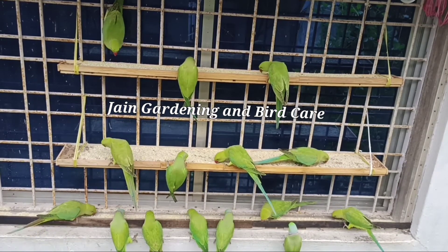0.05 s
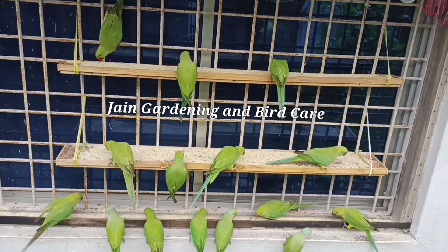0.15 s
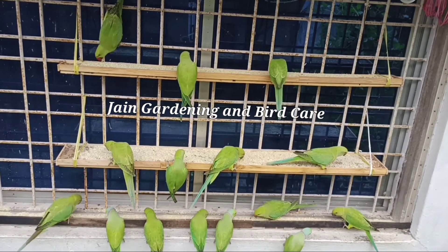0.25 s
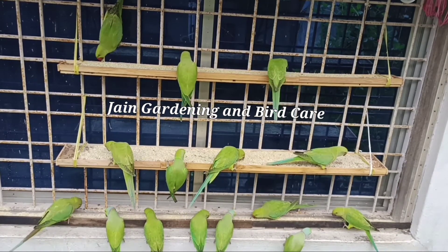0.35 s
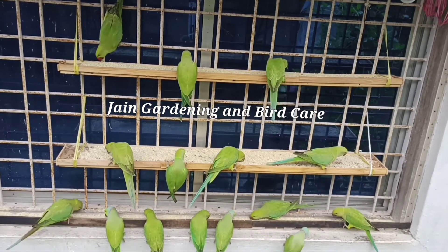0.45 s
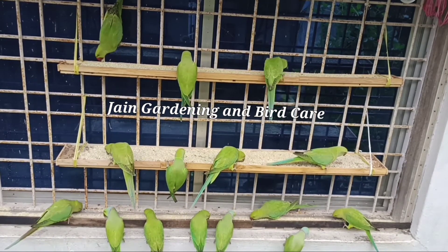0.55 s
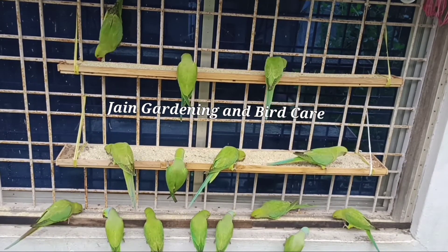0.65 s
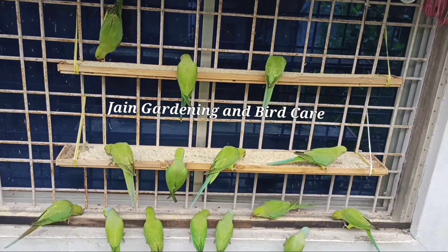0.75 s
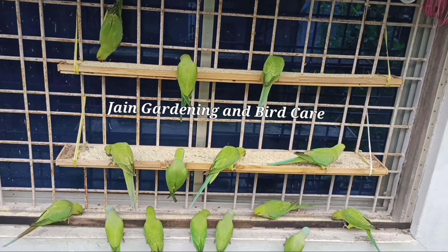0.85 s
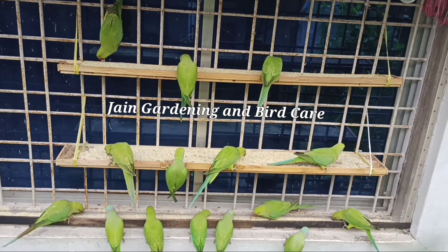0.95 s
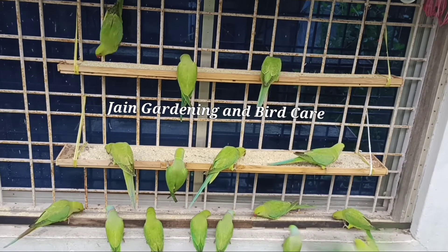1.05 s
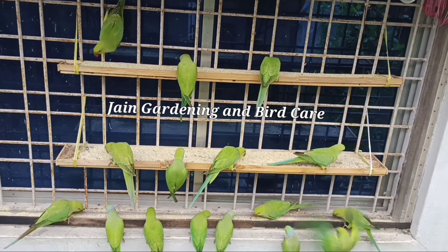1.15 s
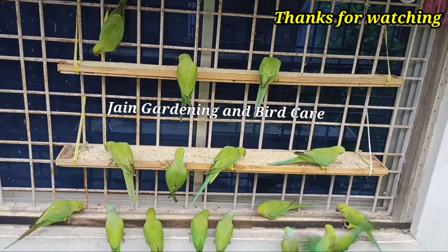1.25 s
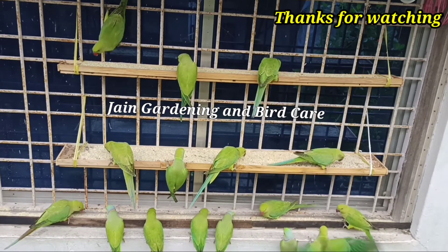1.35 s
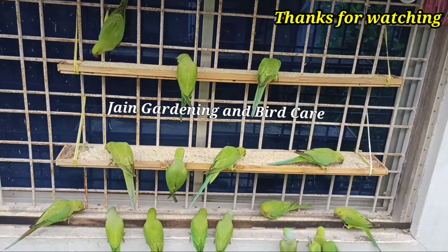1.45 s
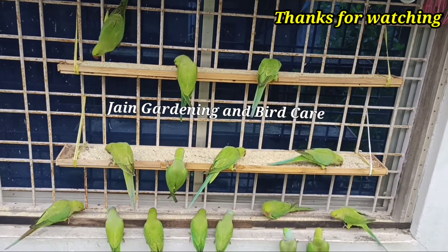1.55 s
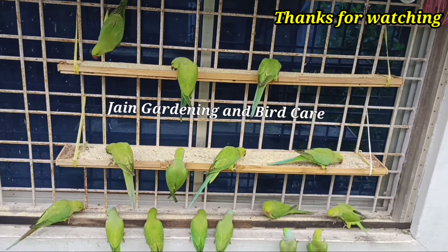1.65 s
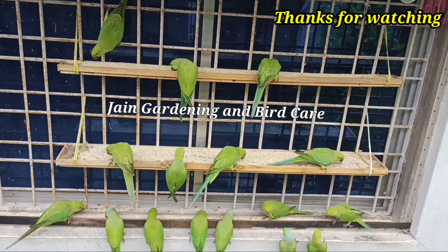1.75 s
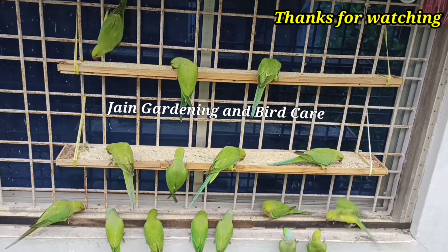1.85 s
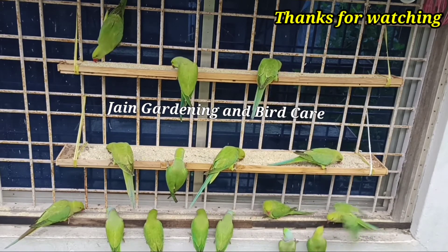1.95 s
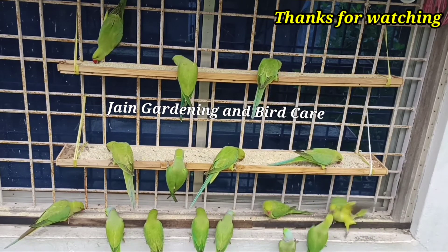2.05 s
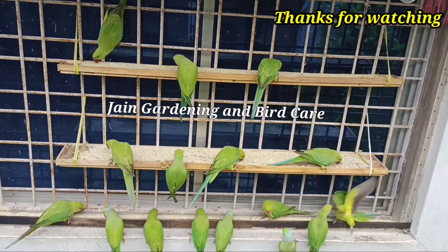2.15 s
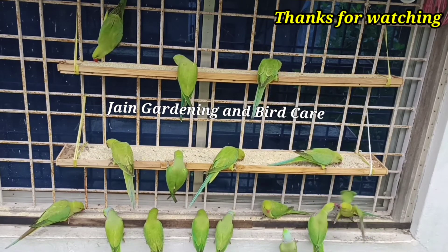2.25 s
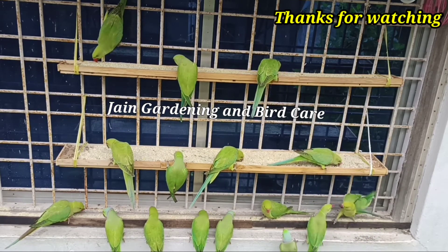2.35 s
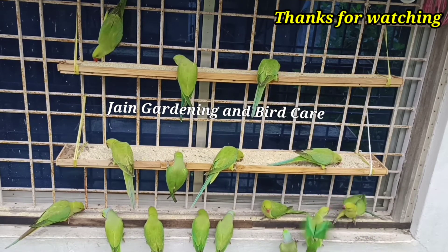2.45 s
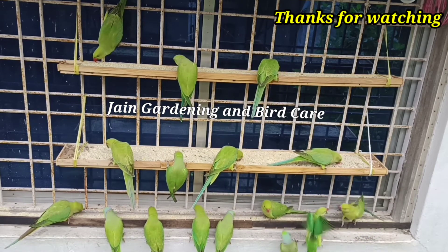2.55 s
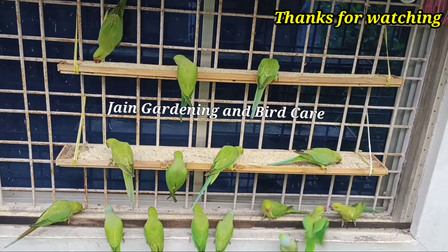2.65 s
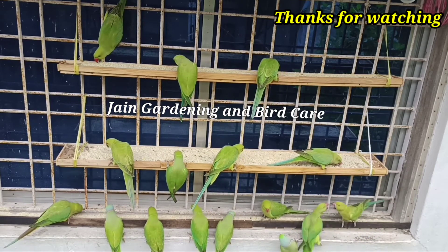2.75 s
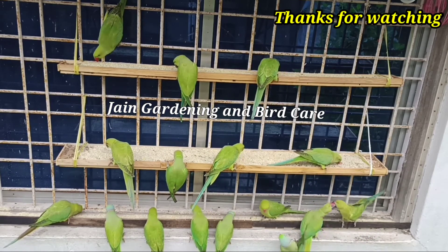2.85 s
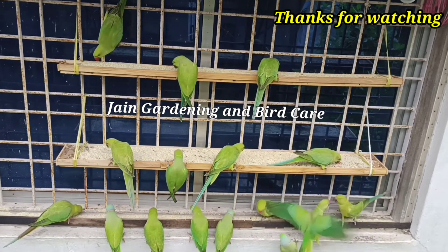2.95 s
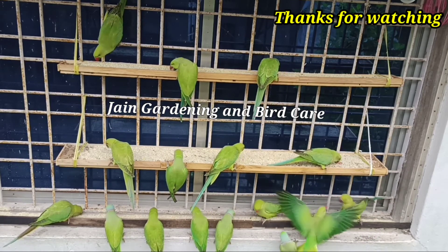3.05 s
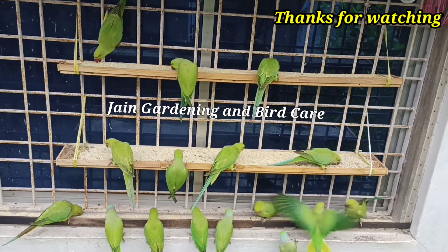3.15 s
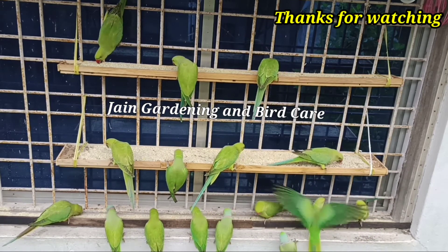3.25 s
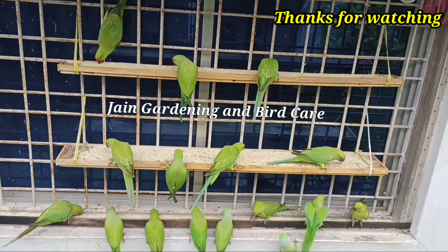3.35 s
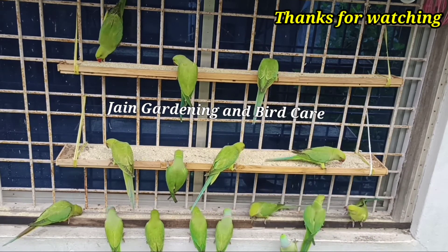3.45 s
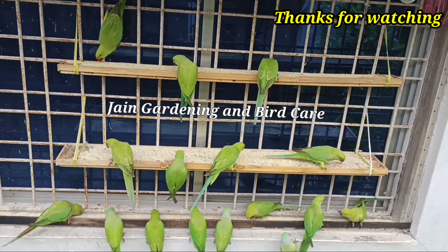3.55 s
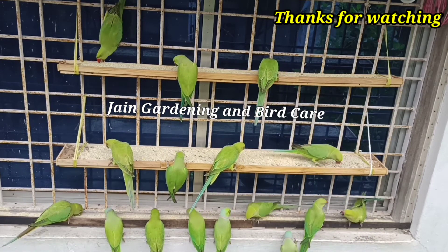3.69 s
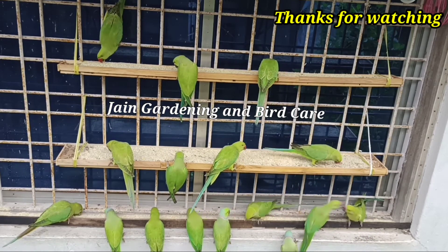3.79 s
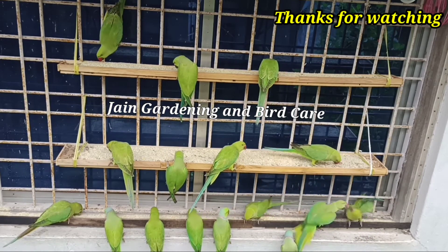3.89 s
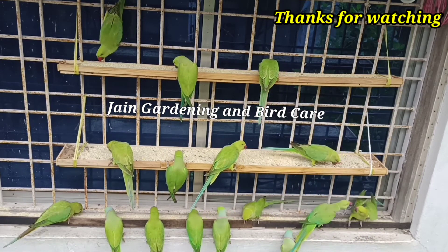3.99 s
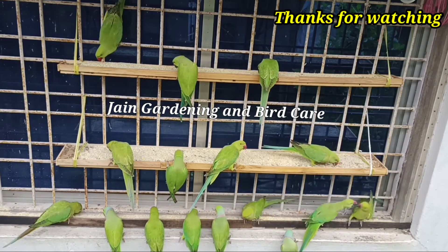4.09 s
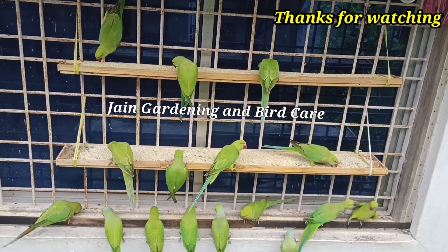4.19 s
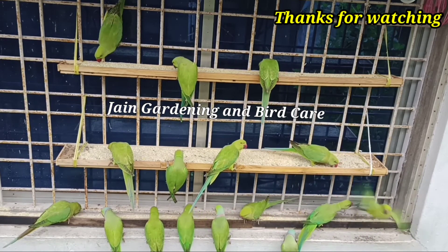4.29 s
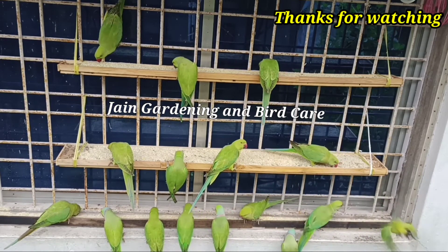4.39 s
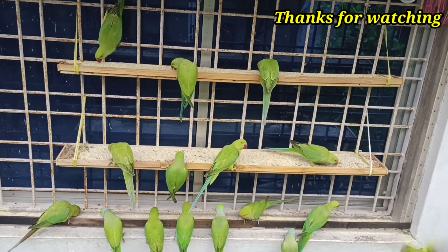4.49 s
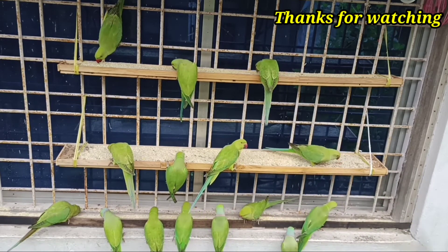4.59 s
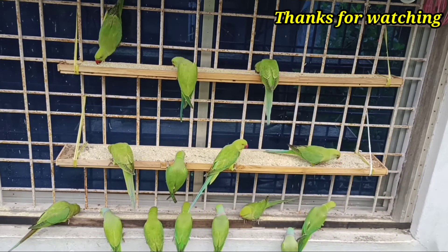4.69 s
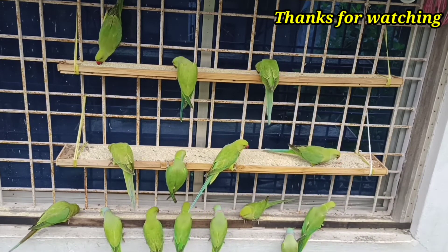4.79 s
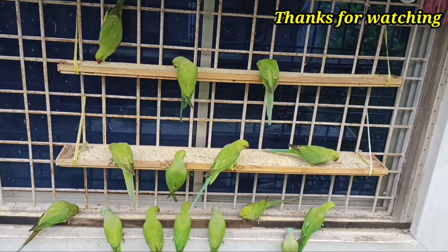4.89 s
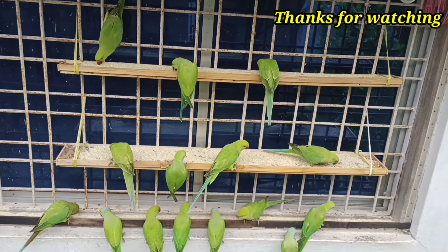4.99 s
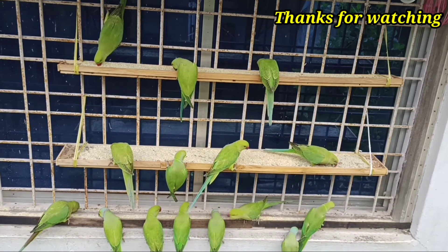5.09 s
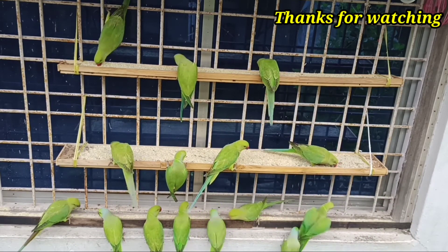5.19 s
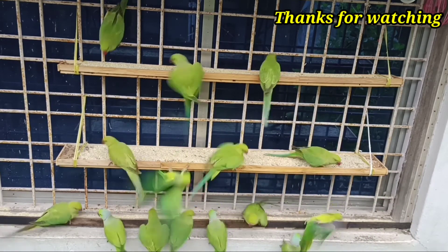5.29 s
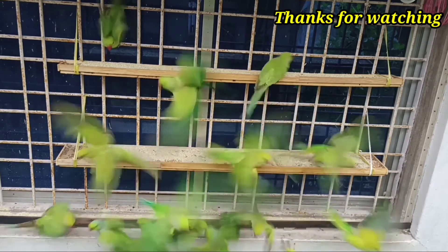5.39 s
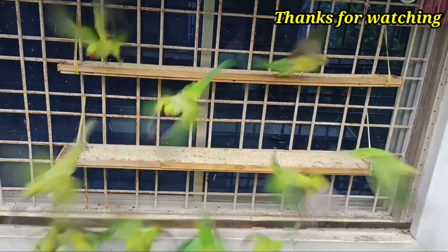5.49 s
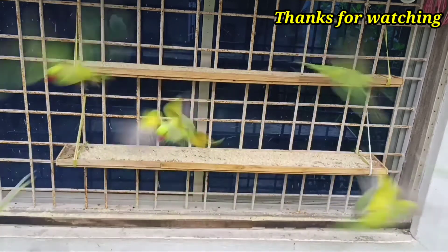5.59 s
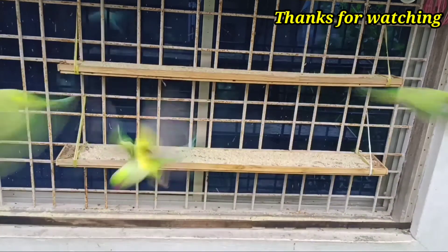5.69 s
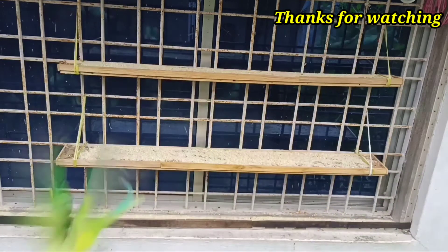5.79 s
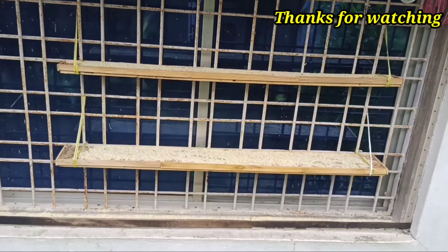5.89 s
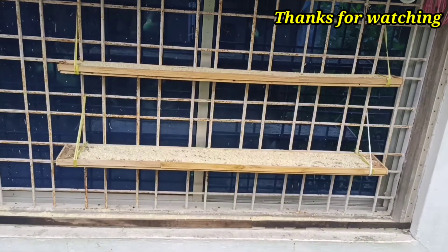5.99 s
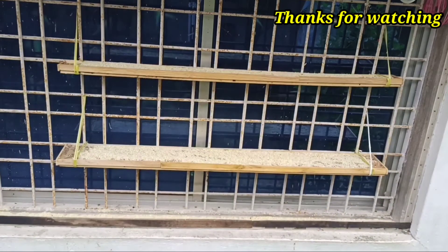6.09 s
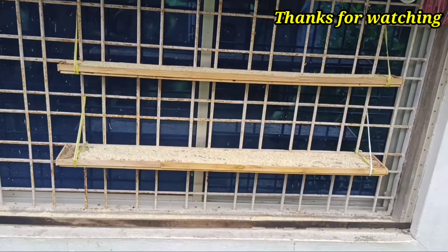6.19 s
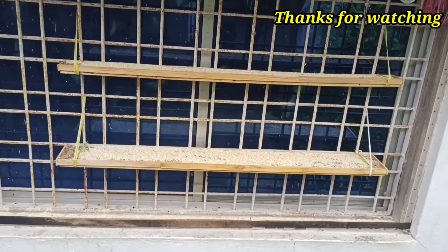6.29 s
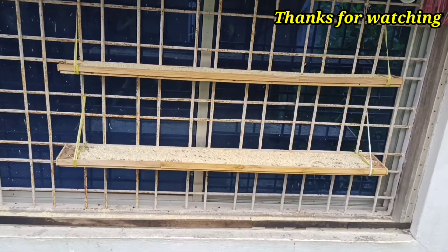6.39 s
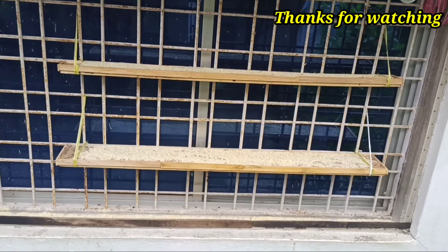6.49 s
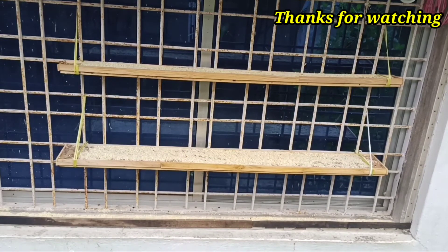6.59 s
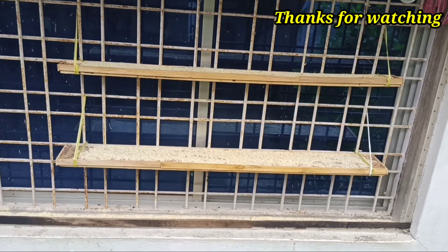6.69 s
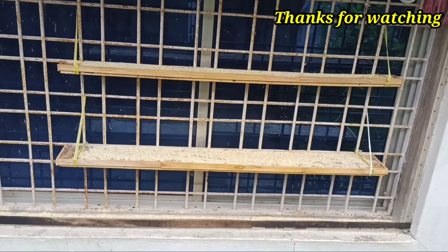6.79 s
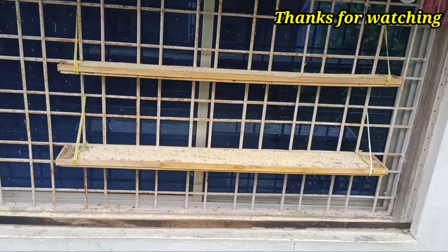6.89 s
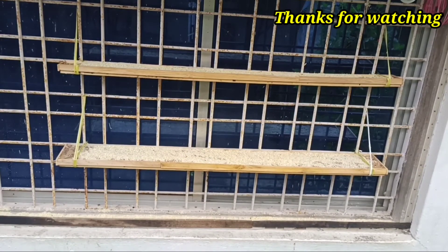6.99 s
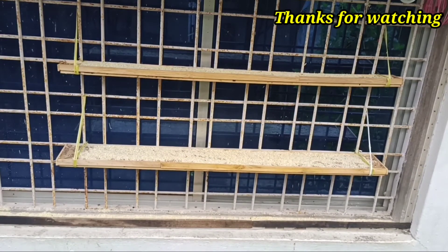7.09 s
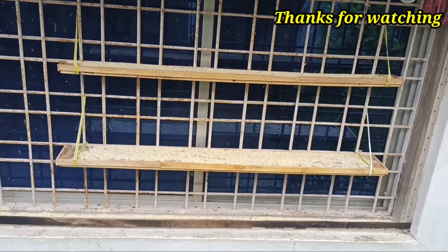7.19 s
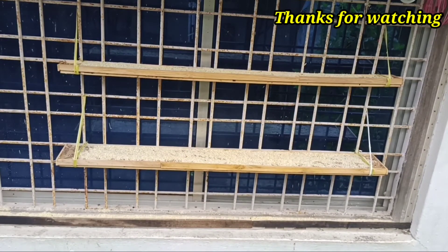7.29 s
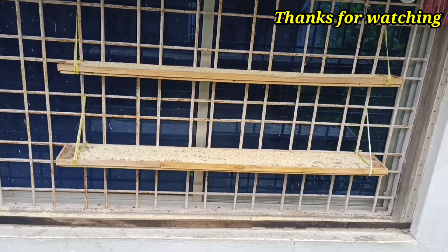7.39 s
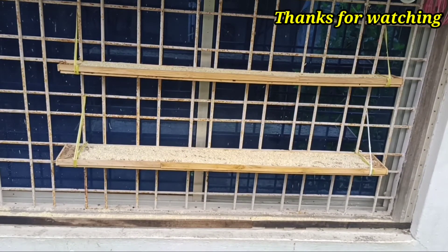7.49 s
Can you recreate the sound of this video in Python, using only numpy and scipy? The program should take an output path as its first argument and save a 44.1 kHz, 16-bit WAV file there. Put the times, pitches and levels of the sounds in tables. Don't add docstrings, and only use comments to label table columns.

```python
import sys
import numpy as np
from scipy import signal
from scipy.fft import rfft, irfft, next_fast_len
from scipy.io import wavfile
from scipy.ndimage import uniform_filter1d, map_coordinates

SR = 44100
rng = np.random.default_rng(int(sys.argv[2]) if len(sys.argv) > 2 else 0)


def unload_wav(signal):
    wavfile.write(
        sys.argv[1],
        SR,
        np.round(np.clip(np.atleast_2d(signal).T, -1, 1) * 32767).astype(np.int16),
    )


def decibels_to_gain(level_db):
    exponent = np.asarray(level_db, float) / 20
    return 10 ** exponent


N = 332514
TIME = np.arange(N) / SR

# start in seconds, peak in dB.
SEED_CRACKS = [(.4081, -9), (1.209, -14), (1.2296, -11), (1.284, -24), (1.3029, -14.5), (1.3863, -16.5),
               (1.5643, -28), (1.6732, -23), (2.1344, -28), (2.6673, -29), (2.825, -14.5), (3.0709, -17.5),
               (3.1614, -16), (3.686, -21)]
BEAK_TICKS = [(.0717, -36), (.6843, -25), (.9487, -21), (1.1199, -23), (1.126, -16.5), (1.4371, -34),
              (1.4516, -28), (1.6863, -24.5), (2.27, -31), (2.295, -23.5), (2.367, -30), (2.4399, -30),
              (2.4566, -25), (2.5636, -39), (2.755, -16), (2.9682, -28), (3.0116, -26), (3.2191, -28),
              (3.4272, -19), (3.4533, -17), (3.6024, -30), (3.6315, -23), (3.6444, -22), (3.83, -30),
              (3.9735, -30), (4.07, -28), (4.144, -35), (4.1964, -29), (4.2835, -46), (4.5, -26),
              (4.6314, -29.5), (4.7247, -26), (4.9003, -35), (5.0908, -16.5), (5.097, -24), (5.1447, -22),
              (5.158, -27)]
WOOD_KNOCKS = [(.0837, -38), (.4081, -30), (.82, -32), (.9827, -31), (1.0155, -27), (3.1444, -33),
               (3.3415, -27), (4.352, -32), (4.577, -39)]
WING_CLAPS = [(5.615, -10), (6.474, -29), (6.943, -26), (5.662, -13), (5.8207, -5), (6.001, -16.5),
              (6.058, -19), (6.3995, -8.5), (6.4892, -5.5), (6.4966, -11), (6.5672, -22), (6.6414, -19.5),
              (7.256, -23.5)]
QUILL_SNAPS = [
    (.2245, -33),
    (6.7925, -10),
    (6.812, -8),
    (6.976, -14),
]

# time in seconds, pitch in Hz, fundamental in dB, overtone in dB.
FIRST_CRY = [(5.318, 3104, -6, -17), (5.326, 3236, -3.5, -18), (5.334, 3573, -6.5, -13),
             (5.364, 3460, -6.5, -13.5), (5.371, 3374, -8, -17), (5.386, 3110, -13.5, -26)]
# time in seconds, pitch in Hz, level in dB, overtone in dB.
HALF_STEP = [(5.327, 5230, -28, -90), (5.345, 5170, -20, -90), (5.366, 5060, -26, -90)]
# time in seconds, pitch in Hz, level in dB, overtone in dB.
DOWNWARD_SNAP = [(5.364, 7140, -28, -90), (5.366, 3640, -21, -90), (5.373, 2140, -18, -90)]
# start in seconds, break in seconds, top pitch in Hz, level in dB.
CRIES = [
    (5.509, 5.584, 3560, -11),
    (5.71, 5.772, 3244, -13),
    (6.746, 6.818, 3236, -11),
    (6.949, 7.015, 3290, -14.5),
]
SLIDE_BENDS = [(.3, 0.27, 0.67, .6), (0.303, 0.296, 0.51, .6), (.38, 0.137, 0.6, .68),
               (0.203, 0.11, .4, 0.43)]
# early overtone in dB, late overtone in dB, third harmonic in dB.
CRY_COLOURS = [(-8.5, -8, -12.5), (-2.5, -8, -8), (-7, -15, -13), (-19, -9, -11.5)]
SLIDE_REACH = [0.99, 1, 0.796, 0.96]
THIRD_TIRES_DB = [1, 2, -1, 1]
# end pitch in Hz, level in dB.
LINGER = [(2400, -11.5), (2510, -5), (2450, -12.5), (2470, -4.5)]
# time in seconds, dip in dB.
CATCHES = [(5.321, -8), (5.3286, -6), (5.333, -9), (5.3455, -13), (5.358, -16), (5.3608, -7), (5.368, -16),
           (5.372, -7), (6.774, -14), (6.779, -9), (6.787, -6), (6.799, 0), (6.986, -6), (6.992, -9),
           (6.998, -2), (7.003, -10)]
# start in seconds, top pitch in Hz, overtone in dB, end pitch as a share of the top.
BREAKS = [
    (5.385, 2193, -9, 0.7),
    (5.582, 2096, -10.5, 0.77),
    (5.768, 2073, -9, .78),
    (6.817, 2027, -14.5, 0.89),
    (7.01, 2044, -13.5, 0.79),
]
RASP_DB = [-6.5, -12, -13, -15, -16]
RASP_S = [0.0053, 0.013, 0.007, 0.0092, 0.0066]

# time in seconds, wing effort in dB, nearness in dB.
STIR = [(0, -36, 0.5), (.14, -39.5, -0.5), (.3, -34, 6.5), (.67, -28.5, -4), (.94, -38, 4),
        (1.07, -35.5, 3), (1.28, -30.5, -1.5), (1.51, -46.5, 3), (1.76, -57, 9.5), (2.67, -52.5, 8),
        (3.3, -46.5, 4), (3.95, -45, 5.5), (4.28, -59.5, 9.5), (4.56, -45.5, -0.5), (4.77, -29.5, -7),
        (4.91, -37, 3), (5.02, -32, 0), (5.31, -30, -4.5)]
# time in seconds, level of stirred air
# in dB, nearness in dB.
TAKE_OFF = [(5.37, -39.5, -5), (5.52, -23, 6.5), (5.65, -15.5, 0.5), (6.04, -21, 0.5), (6.57, -21, 1),
            (6.68, -24.5, 1.5), (6.73, -22.5, 1.5), (6.85, -23.5, 0), (7.54, -28, 2.5)]
# frequency in Hz, density in dB per Hz.
THRUM = [(25, -52), (40, -13.5), (74, -3.5), (210, -4), (273, 1.5), (414, -5), (664, -11.5), (1200, -29),
         (1560, -25), (2640, -120)]
RUSTLE = [(470, -12.5), (800, -3), (2280, -13), (3000, -11.5), (7130, -11.5), (10000, -15.5), (13000, -57),
          (22000, -120)]
HISS = [(7500, -4.5), (10500, -10.5), (13500, -5), (15550, -1.5), (15750, -45)]
# time in seconds, whistle in Hz, whistle in dB, puff in dB.
STROKES = [(2.75, 970, -48, -38.5), (2.9, 1026, -47, -46), (3.05, 1074, -47, -45.5),
           (3.195, 1170, -47, -41), (3.341, 1170, -43, -36), (3.47, 1167, -38, -33), (3.599, 944, -46, -40)]

# start in seconds, peak in dB.
CLAW_STRIKES = [
    (2.689, -15.5),
    (3.34, -16),
    (4.3954, -34.5),
]
# frequency in Hz, level in dB, t60 in seconds.
BAR_MODES = [
    [(3620, -9, 0.44), (3830, -2.5, 0.44), (4360, -3, .42), (4780, -8, 0.22), (5100, -9, 0.31),
     (5669, -4, 0.35), (6000, -9, .2), (7050, -4, 0.69), (7720, 6, 0.65), (8005, -2, 0.22), (8800, 1, 0.3),
     (9200, -3, 0.4), (10270, 6, 0.18), (12600, 11, 0.14), (13980, 1, 0.46), (14940, 7, 0.26)],
    [(3844, -6, 0.3), (4328, -9, .4), (4759, -10, .4), (5640, -12, .15), (7700, -22, 5.0),
     (8059, -13, 0.43), (8130, 3, 0.65), (8730, 3, 0.48), (8800, -15, 0.19), (10310, -14, 0.33),
     (13260, -6, 0.13), (14090, 4, 0.16), (14670, -2, 0.37), (15250, 5, 0.19)],
    [(8059, 7, 0.16), (8764, -16, 0.86), (14070, 0, 0.028), (15370, -1, 0.038)],
]

# time in seconds, level in dB.
GROWL = [(.227, -30), (.25, -28), (.254, -18.5), (.31, -18.5), (.335, -24), (.36, -28), (.4, -44)]
# frequency in Hz, width in Hz, level in dB.
THROAT_WIDE = [(1450, 340, 3.5), (2300, 680, 2), (3050, 760, 6), (7580, 1250, 4.5), (10550, 1900, -1.5),
               (14300, 1200, -5)]
THROAT_CLOSING = [(1290, 300, 2), (2550, 520, 3.5), (3650, 610, 4), (7760, 1700, 4), (10500, 1100, -15),
                  (14000, 1200, -4)]
CLOSING_S = [0.293, 0.302]

# start in seconds, end in seconds, start pitch in Hz, end pitch in Hz, level in dB.
PURE_MUTTERS = [
    (2.385, 2.43, 1890, 1540, -46.5),
    (4.192, 4.215, 1640, 1640, -37.5),
    (4.772, 4.79, 1980, 1980, -39.5),
]
NASAL_MUTTERS = [
    (3.675, 3.7, 824, 913, -39.5),
    (3.918, 3.965, 1063, 768, -41),
    (4.278, 4.325, 2140, 2320, -44.5),
]
# time in seconds, pitch in Hz, fundamental in dB, overtone in dB.
CROAK = [
    [(.09, 543, -38, -41.5), (.125, 583, -38, -47)],
]

# start in seconds, climb in seconds, end in seconds, ceiling in Hz, level in dB.
FAR = [
    (.783, 0.083, .903, 4780, -40),
    (0.956, 0.062, 1.085, 4525, -32),
    (4.94, 0.044, 5.075, 4743, -25.5),
]
CLIMBS = [(.66, .78), (.62, .7), (.62, .88)]
WARBLES = [.11, .17, .18]
# start in seconds, end in seconds, start pitch in Hz, end pitch in Hz, level in dB.
PEEPS = [(.948, .99, 5100, 5200, -48), (.95, .985, 5650, 5700, -53), (1.175, 1.2, 8600, 9700, -42),
         (3.76, 4.0, 3160, 3050, -62), (4.92, 4.975, 5330, 6100, -41), (5.03, 5.048, 2780, 2750, -47)]

# time in seconds, level in dB.
CRICKET_LOW = [(0, -60), (.5, -51), (1.3, -50), (1.9, -58), (3, -56), (3.6, -53.5), (4.3, -57), (5.3, -52)]
CRICKET_HIGH = [(0, -51), (1.3, -47), (1.8, -52.5), (2.9, -54), (3.6, -49.5), (3.8, -52), (3.95, -62)]
# start in seconds, end in seconds, start pitch in Hz, end
# pitch in Hz, level in dB.
COOS = [(0.511, 0.62, 304, 302, -35.5), (0.753, 0.878, 289, 267, -42.5), (1.055, 1.2, 270, 265.6, -37),
        (1.173, 1.388, 271.4, 261.6, -36.5), (1.559, 1.632, 441, 442, -50.5),
        (1.767, 1.873, 451, 464, -53.5), (1.951, 2.03, 570, 616, -55), (2.03, 2.084, 610, 650, -44),
        (2.067, 2.16, 653, 642, -44), (2.244, 2.36, 639, 692, -45), (2.4, 2.472, 670, 610, -45),
        (2.519, 2.549, 636, 627, -40.5), (2.623, 2.694, 628, 615, -50), (3.235, 3.273, 285, 270, -38.5),
        (3.584, 3.617, 504, 450, -41), (3.759, 4.091, 432, 503, -52)]
# frequency in Hz, density in dB per Hz.
STREET = [(24, -61), (40, -25), (124, -1), (229, -9), (457, -11), (900, -20.5), (1170, -56), (1980, -120)]
# frequency in Hz, t60 in seconds.
YARD = [(300, 0.045), (3000, 0.38), (8000, 0.48), (15000, 0.39)]
# time in seconds, gain in dB.
LEVEL_DIP = [(.905, -3), (.909, -11), (.945, -7), (.955, -3)]


def unit(x):
    return x / np.sqrt(np.mean(x ** 2) + 1e-20)


def along(points, hz):
    f, v = np.transpose(points)
    return np.interp(np.log(hz + 1), np.log(f + 1), v)


def curves(rows, t=TIME):
    s, *cols = np.transpose(rows)
    return [np.interp(t, s, c) for c in cols]


def wobble(rate, size=N):
    knots = rng.standard_normal(int(size * rate / SR) + 4)
    return map_coordinates(knots, [np.arange(size) * rate / SR])


def filtered(x, response):
    m = next_fast_len(len(x) + 8192)
    return irfft(rfft(x, m) * response(np.fft.rfftfreq(m, 1 / SR)), m)[:len(x)]


def modes(peaks):
    def response(f):
        return sum((-1) ** k * decibels_to_gain(db) * 1j * f * w / (c * c - f * f + 1j * f * w)
                   for k, (c, w, db) in enumerate(peaks))
    return response


def add(track, s, sound):
    part = track[round(s * SR):][:len(sound)]
    part += sound[:len(part)]


def rush(spectrum, patchy_db):
    z = signal.stft(rng.standard_normal(N), nperseg=512)[2]
    field = uniform_filter1d(rng.standard_normal(z.shape), 8, 0)
    field = uniform_filter1d(field, 8, 1)
    noise = signal.istft(z * decibels_to_gain(patchy_db * unit(field)), nperseg=512)[1][:N]
    return unit(filtered(noise, lambda hz: decibels_to_gain(along(spectrum, hz))))


def yard(x, wet_db, longer=1):
    out, step = x.copy(), SR // 4
    for k in range(0, N, step):
        hz, t, z = signal.stft(rng.standard_normal(SR // 2), SR, nperseg=256)
        decay = decibels_to_gain(-60 * t / (longer * along(YARD, hz)[:, None]))
        tail = signal.istft(z * decay, SR, nperseg=256)[1]
        echo = signal.fftconvolve(x[k:k + step], tail / np.linalg.norm(tail))
        add(out, k / SR + .004, decibels_to_gain(wet_db) * echo)
    return out


def notes(tables, jitter, flutter_db, flutter_hz, higher_db, breath_db=-40, warble=0, edge=0.00079):
    out = np.zeros(N)
    for rows in tables:
        t = np.arange(rows[0][0], rows[-1][0], 1 / SR)
        size = len(t)
        hz, first_db, second_db = curves(rows, t)
        hz = hz * (1 - warble * np.sin(np.pi * 140 * t + 1.57 * wobble(25.2, size)) ** 6)
        phase = 2 * np.pi * np.cumsum(hz * (1 + jitter * wobble(flutter_hz, size))) / SR
        levels = [first_db, second_db] + [second_db + db for db in higher_db]
        tone = np.zeros(size)
        for k, db in enumerate(levels, 1):
            strength = decibels_to_gain(db + flutter_db * wobble(flutter_hz, size)) * (k * hz < 16000)
            breath = 1 + k * decibels_to_gain(breath_db) * wobble(1800, size)
            tone += strength * np.sin(k * phase) * breath
        fade = np.clip(np.minimum(t - t[0], t[-1] - t) / edge, 0, 1)
        add(out, t[0], np.sqrt(2) * fade * tone)
    return out


def glides(rows, peak, reach, start_db, end_db, overtone_db):
    tables = []
    for a, b, hz0, hz1, db in rows:
        points = [(a, hz0, db + start_db),
                  (a + peak * (b - a), hz0 + reach * (hz1 - hz0), db),
                  (b, hz1, db + end_db)]
        tables.append([(s, hz, level, level + overtone_db) for s, hz, level in points])
    return tables


def ticks():
    out, t = np.zeros(N), np.arange(1500) / SR
    dull = modes([(4060, 5200, 0)])
    kinds = [(SEED_CRACKS, -6), (BEAK_TICKS, 3), (WOOD_KNOCKS, 18), (WING_CLAPS, 10)]
    for rows, low_db in kinds:
        for s, db in rows:
            decay = decibels_to_gain(-60 * t / .007) + decibels_to_gain(-19 - 60 * t / .07)
            burst = decay * rng.standard_normal((2, len(t)))
            burst = 5 * burst / np.linalg.norm(burst[:, :130], axis=1, keepdims=True)
            husk_hz = 8300 * 1.05 ** rng.uniform(-0.16, 1)
            shell = modes([(husk_hz, 1900, 6.5), (13700, 3000, -4)])
            add(out, s, decibels_to_gain(db - 5) * (filtered(burst[0], shell) + decibels_to_gain(low_db) * filtered(burst[1], dull)))
    for s, db in WING_CLAPS:
        thump = decibels_to_gain(-60 * t / 0.023) * rng.standard_normal(len(t))
        add(out, s, decibels_to_gain(db - 20) * unit(filtered(thump, modes([(895, 800, 0)]))))
    for s, db in QUILL_SNAPS:
        snap = decibels_to_gain(-60 * t / .012) * rng.standard_normal(len(t))
        add(out, s, decibels_to_gain(db + 4) * filtered(snap, lambda f: modes([(13200, 4500, 0)])(f) ** 2))
    return yard(out + stray_clicks(), wet_db=-9, longer=0.29)


def stray_clicks():
    air_db = stirred_air()[0 + 1]
    quill_db = air_db + 21 + 2 * rng.standard_normal(N)
    quills = (rng.random(N) < 310 / SR) * rng.standard_normal(N) * decibels_to_gain(quill_db)
    husk_db = np.minimum(air_db, -47) + 24 + 2.5 * rng.standard_normal(N)
    husks = (rng.random(N) < 90 / SR) * rng.standard_normal(N) * decibels_to_gain(husk_db)
    bright = modes([(8550, 680, 12), (13700, 2500, -23)])
    return filtered(quills, modes([(6000, 9000, 0)])) + filtered(husks, bright)


def screeches():
    out = notes([FIRST_CRY, HALF_STEP, DOWNWARD_SNAP], .008, 1.2, 200, [-8, -13], breath_db=-14, edge=.001)
    out += notes(upper_voice(), .013, 2.2, 260, [-20, -11], breath_db=-14, edge=.002)
    catch_db = sum(db * np.exp(-((TIME - s) / .0016) ** 2) for s, db in CATCHES)
    out = out * decibels_to_gain(catch_db)
    out += notes(lower_voice(), .022, 4, 300, [-10, -15, -20], breath_db=-10, edge=.009)
    t = np.arange(-.012, .02, 1 / SR)
    beak = modes([(1640, 180, -1), (4170, 1270, 3.5), (7760, 5200, -11)])
    starts = [FIRST_CRY[0][0] + 0.000987] + [cry[0] - .003 for cry in CRIES]
    for s, db, lasts in zip(starts, RASP_DB, RASP_S):
        puff = unit(filtered(rng.standard_normal(len(t)), beak))
        add(out, s + t[0], decibels_to_gain(db) * np.exp(-(t / lasts) ** 2) * puff)
        add(out, s + t[0] - .012, decibels_to_gain(db - 24) * np.exp(-(t / 0.005) ** 2) * puff[::-1])
    kick = rng.standard_normal(len(t)) * np.exp(-(t / 0.0042) ** 2)
    knock = filtered(kick, modes([(1040, 210, 0), (1580, 190, 0), (2380, 1200, 0)]))
    add(out, 5.319 + t[0], decibels_to_gain(-24) * unit(knock))
    return yard(out, wet_db=-3)


def upper_voice():
    break_hz, trail_s, swell_s, linger_s = 2745, 0.0144, 0.014, 0.026
    tables = []
    settings = zip(CRIES, LINGER, SLIDE_BENDS, CRY_COLOURS, SLIDE_REACH, THIRD_TIRES_DB)
    for cry, (end_hz, linger_db), (u1, d1, u2, d2), colour, reach, tires_db in settings:
        s, cut, top_hz, db = cry
        early_db, late_db, third_db = colour
        length, end = cut - s, cut + trail_s
        stages = [s, s + swell_s, cut - .01, end]
        t = np.sort(stages + [s + u1 * length, s + u2 * length])
        share = (t - s) / length
        drop = np.interp(share, [0, u1, u2, 1, 2], [0, d1, d2, reach, reach + 1])
        hz = top_hz + (break_hz - top_hz) * drop
        first_db = db + np.interp(t, stages, [-5, 0, .5, -17])
        second_db = db + np.interp(t, stages, [-25, early_db, late_db, late_db - 9])
        tables.append(np.transpose([t, hz, first_db, second_db]))
        tables.append(np.transpose([t, 3 * hz, first_db + third_db + tires_db * share, first_db - 80]))
        tables.append([(cut - .004, 2 * break_hz, db - 20, -90),
                       (end, 2.06 * end_hz, db + linger_db, -90),
                       (end + linger_s, 1.94 * end_hz, db + linger_db - 5, -90)])
    return tables


def lower_voice():
    shape = [(0, -29, 0), (.4, -15, -3.25), (1, -35, -13)]  # (share of time, fundamental dB, overtone dB)
    return [[(s + u * .036, hz * fall ** u ** 1.12, db + first_db, db + second_db)
             for u, first_db, second_db in shape] for s, hz, db, fall in BREAKS]


def stirred_air():
    def power_sum(db, still_db):
        return 10 * np.log10(decibels_to_gain(db) ** 2 + decibels_to_gain(still_db) ** 2 + 1e-12)
    effort_db, near_db = curves(STIR + TAKE_OFF)
    strokes = sum(decibels_to_gain(db - 4.5) * np.exp(-((TIME - s) / .074) ** 2) for s, _, _, db in STROKES)
    effort_db = power_sum(effort_db, 20 * np.log10(strokes + 1e-9))
    swing = .96 * (effort_db + 20.5)
    rustle_db = power_sum(swing - 36.5 + near_db, -61.5)
    hiss_db = power_sum(swing - 31.5 + near_db, -62.5)
    return effort_db, rustle_db, hiss_db


def wings():
    thrum_db, rustle_db, hiss_db = stirred_air()
    beat = wobble(20)
    flutter = .5 * beat + 1.3 * wobble(70)
    thrum = decibels_to_gain(thrum_db + .6 * beat + wobble(45)) * rush(THRUM, patchy_db=.9)
    rustle = decibels_to_gain(rustle_db + 6 + flutter) * rush(RUSTLE, patchy_db=1)
    hiss_db = hiss_db + 1.5 + flutter + 1.8 * wobble(12) + 2.4 * wobble(50)
    return thrum + rustle + decibels_to_gain(hiss_db) * rush(HISS, patchy_db=1)


def hovering():
    whistles = [[(s - .025, .78 * hz, db - 4, -90), (s, hz, db, db - 10), (s + .02, 1.12 * hz, db - 5, -90)]
                for s, hz, db, _ in STROKES]
    hums = [[(s - .02, .439 * hz, db - 14, -90), (s + .0044, .52 * hz, db - 2, -90),
             (s + .032, .53 * hz, db - 8, -90)] for s, hz, _, db in STROKES]
    out = notes(whistles, .015, 2, 150, [])
    out += notes(hums, .023, 2.1, 80, [], edge=.006)
    t = np.arange(-.05, .05, 1 / SR)
    for s, _, _, puff_db in STROKES:
        puff = unit(filtered(rng.standard_normal(len(t)), modes([(536, 240, 0)])))
        add(out, s - .04, decibels_to_gain(puff_db - 3) * np.exp(-(t / 0.031) ** 2) * puff)
    return out


def bars():
    out, t = np.zeros(N), np.arange(SR // 3) / SR
    for (s, db), steel in zip(CLAW_STRIKES, BAR_MODES):
        crowd = [(4200 + 11300 * u ** 1.6, -18 + 6 * v, .3) for u, v in rng.random((30, 2))]
        ring = np.zeros(len(t))
        for hz, level, t60 in steel + crowd:
            decay = decibels_to_gain(level - 60 * t / min(t60, .4) + 1.4 * wobble(210, len(t)))
            ring += decay * np.sin(2 * np.pi * (hz * t + rng.random()))
        scrape = filtered(rng.standard_normal(len(t)), modes([(4960, 3700, -13), (11400, 5300, 9)]))
        scrape = decibels_to_gain(3.5 - 60 * t / 0.24) * scrape
        add(out, s, decibels_to_gain(db - 16.5) * (1 - np.exp(-t / 0.0012)) * (ring + scrape))
    return out


def growl():
    bursts_per_s, first_loud_s = 119.3, .2555
    db, = curves(GROWL)
    gate = np.cos(np.pi * bursts_per_s * (TIME - first_loud_s)) ** 4 * decibels_to_gain(2.1 * wobble(124.3))
    on = (TIME > GROWL[0][0]) & (TIME < GROWL[-1][0])
    repeated = np.interp(TIME * bursts_per_s % 1, np.arange(370) / 369, rng.standard_normal(370))
    breath = gate * (rng.standard_normal(N) + .35 * repeated)
    late = np.interp(TIME, CLOSING_S, [0, 1])

    def voiced(throat):
        return unit(filtered(breath, lambda f: modes(throat)(f) ** 2))
    voice = (1 - late) * voiced(THROAT_WIDE) + late * voiced(THROAT_CLOSING)
    return yard(decibels_to_gain(db + 2) * on * voice, wet_db=-6)


def mutters():
    soft = glides(PURE_MUTTERS, 0.28, 0.39, start_db=-7, end_db=-9, overtone_db=-21)
    soft += glides(NASAL_MUTTERS, 0.37, 0.88, start_db=-4.5, end_db=-9, overtone_db=1.5)
    out = notes(soft, 0.042, 4.2, 226, [-22], breath_db=-30)
    out += notes(CROAK, 0.0068, 2.4, 103, [-3.5, -15, -8, -5, -3, -8, -3])
    return yard(out, wet_db=-7.5)


def far_calls():
    peeps = glides(PEEPS, 0.51, 0.625, start_db=-3, end_db=-7, overtone_db=-35)
    out = notes(peeps, 0.011, 3.7, 330, [], breath_db=-24)
    for (s, climb, end, hz, db), (low, mid), depth in zip(FAR, CLIMBS, WARBLES):
        start_db = db - 6 - .8 * (db + 44.5)
        sag_s = max(end - .032, min(s + climb + .03, end - .003))
        call = [(s, low * hz, start_db, db - 38),
                (s + 0.43 * climb, mid * hz, db - 3, db - 18),
                (s + climb, hz, db, db - 23),
                (sag_s, hz, db - 3.06, db - 33),
                (end, .94 * hz, db - 8.5, db - 38)]
        out += notes([call], .004, 4, 330, [], breath_db=-30, warble=depth)
    return yard(out, wet_db=4.5, longer=.8) * decibels_to_gain(2 * curves(LEVEL_DIP)[0] + 6)


def cricket(rows, hz, width_hz, pulse_hz, centre, duty):
    chirp = np.exp(-((((TIME - centre) / .1426 + .5) % 1 - .5) / duty) ** 4)
    stroke = .35 + np.sin(np.pi * np.cumsum(pulse_hz * (1 + .08 * wobble(6.8))) / SR) ** 2
    ringing = unit(filtered(rng.standard_normal(N), modes([(hz, width_hz, 0)])))
    carrier = np.sin(2 * np.pi * hz * TIME) + .7 * ringing
    level = decibels_to_gain(curves(rows)[0] + 2 + 1.5 * wobble(30)) * (TIME < rows[-1][0])
    return level * unit(chirp * stroke * carrier)


def pigeons():
    tables = [[(a, hz0, db + 2.5, db - 20), ((a + b) / 2, (hz0 + hz1) / 2, db + 1, db - 26),
               (b, hz1, db + 1.5, db - 14)] for a, b, hz0, hz1, db in COOS]
    return yard(notes(tables, .017, 3, 55, [], edge=.012), wet_db=-4, longer=2.5)


def street():
    return decibels_to_gain(-48 + 0.43 * wobble(3.77)) * rush(STREET, patchy_db=1)


def scene():
    birds = ticks() + screeches() + wings() + hovering() + bars() + growl() + mutters() + far_calls()
    crickets = cricket(CRICKET_LOW, hz=6270, width_hz=250, pulse_hz=92, centre=.03, duty=.25)
    crickets += cricket(CRICKET_HIGH, hz=7310, width_hz=200, pulse_hz=54, centre=.012, duty=.5)
    return (birds + crickets + pigeons() + street())[None]


def band_limit(x):
    return signal.sosfilt(signal.butter(12, 16610, fs=SR, output="sos"), x)


def record(dry):
    def shelf(hz):
        return decibels_to_gain(along([(15600, 0), (15800, -22), (16550, -24), (16650, -70)], hz))
    x = dry[0] * decibels_to_gain(curves(LEVEL_DIP)[0])
    x = x / (1 + np.abs(x / 1.02) ** 8) ** (1 / 8)
    mix = filtered(x, shelf)[None]
    return band_limit(mix)


dry = scene()
out = record(dry)
unload_wav(out)
```